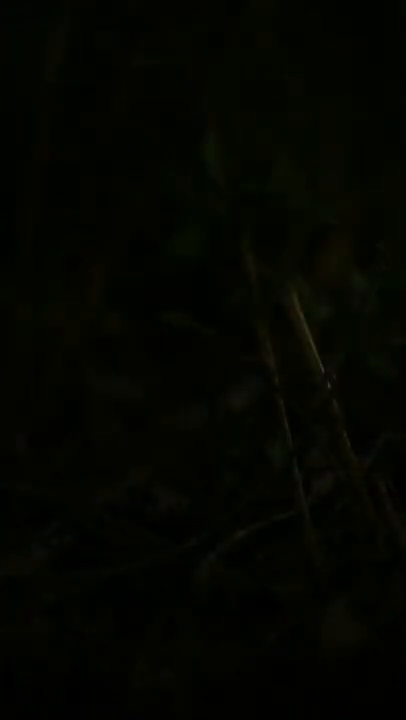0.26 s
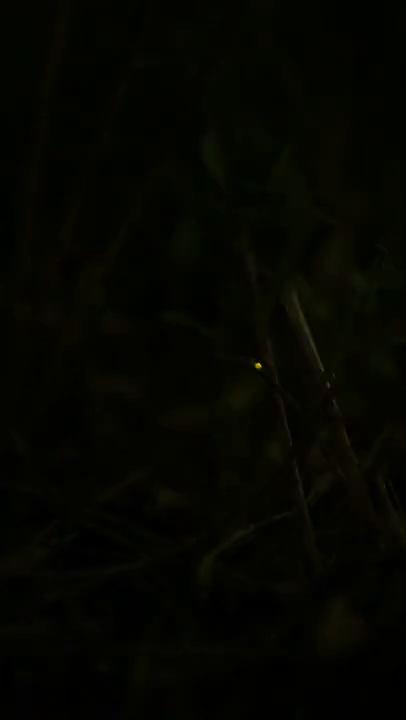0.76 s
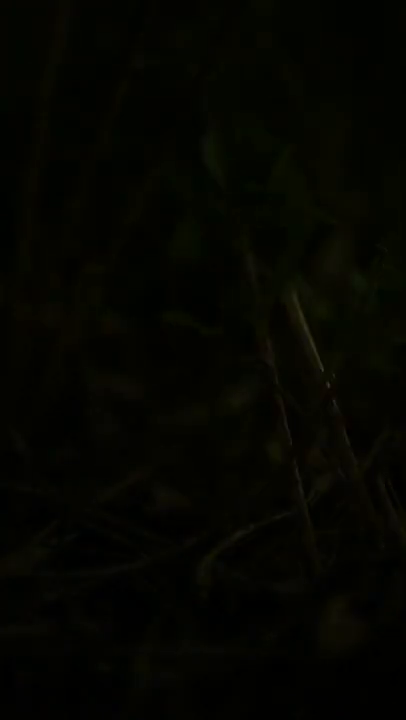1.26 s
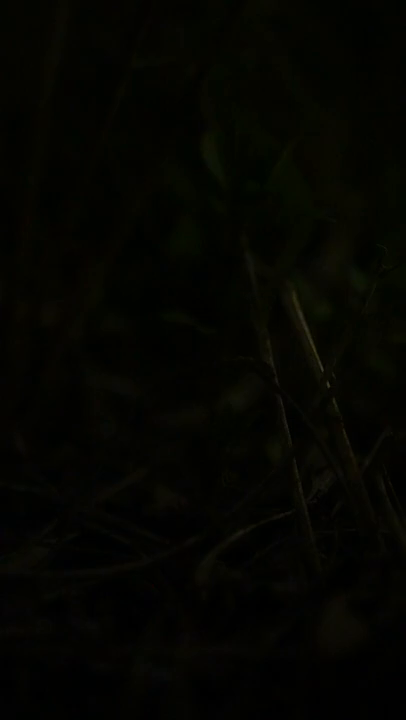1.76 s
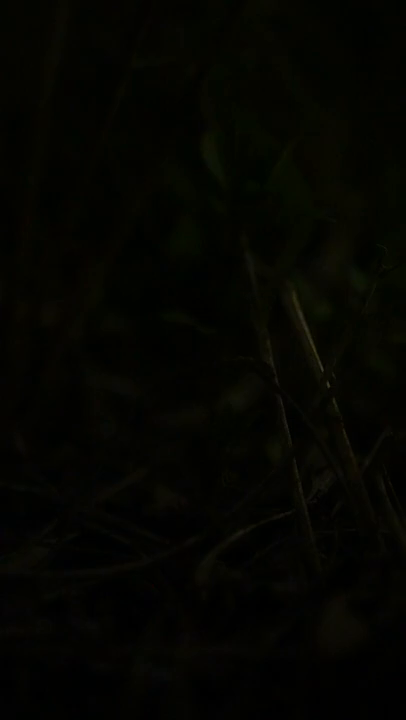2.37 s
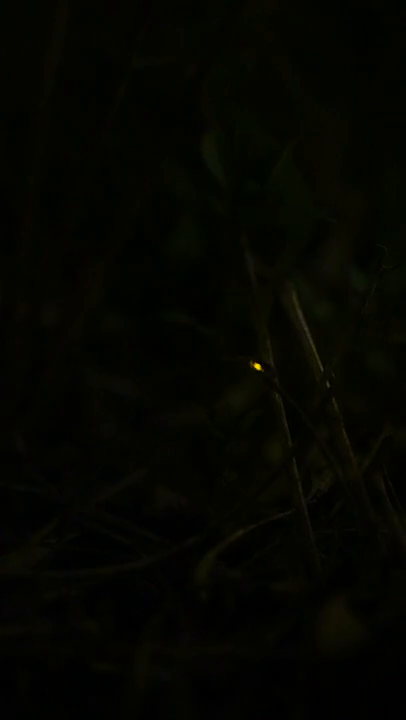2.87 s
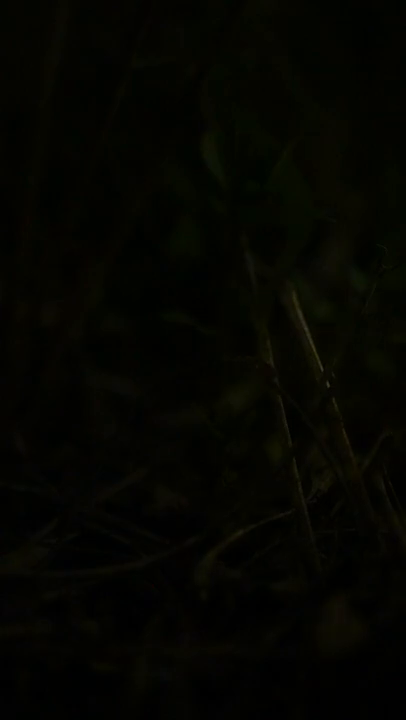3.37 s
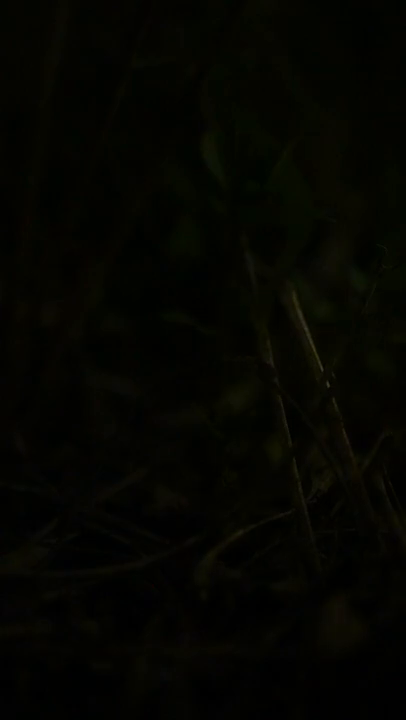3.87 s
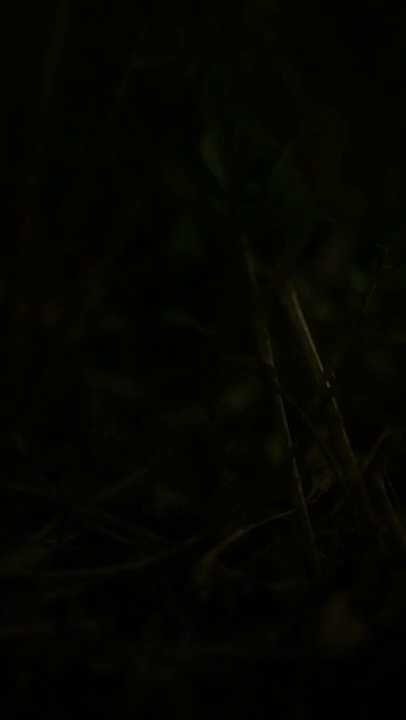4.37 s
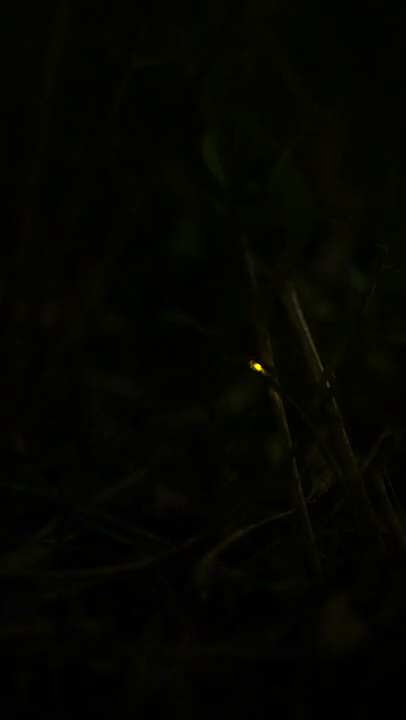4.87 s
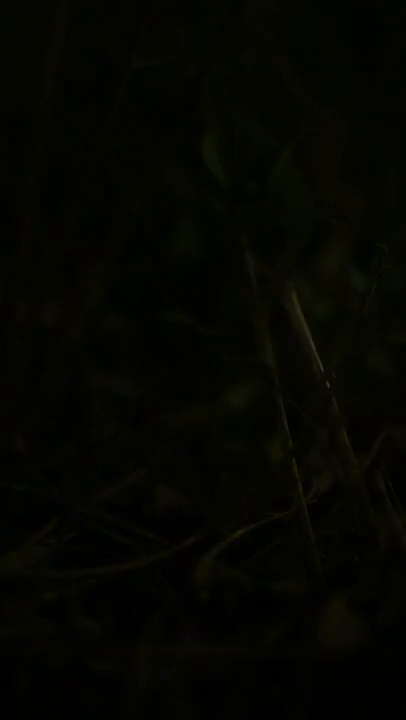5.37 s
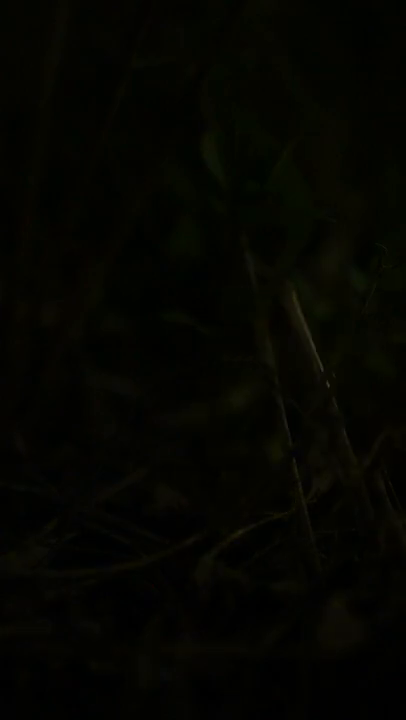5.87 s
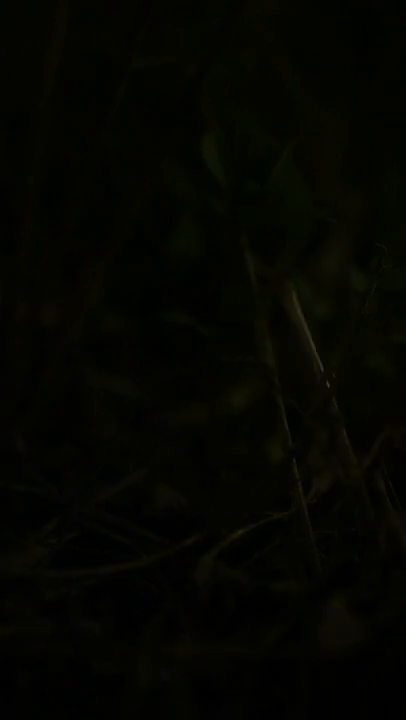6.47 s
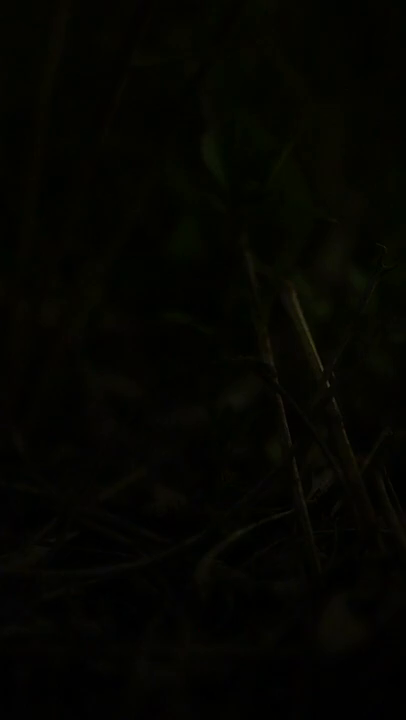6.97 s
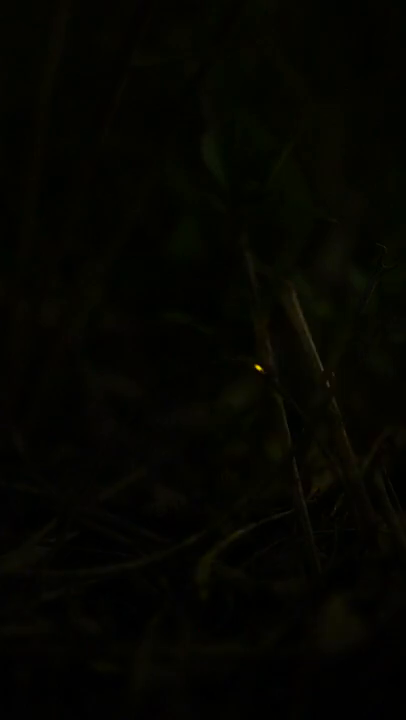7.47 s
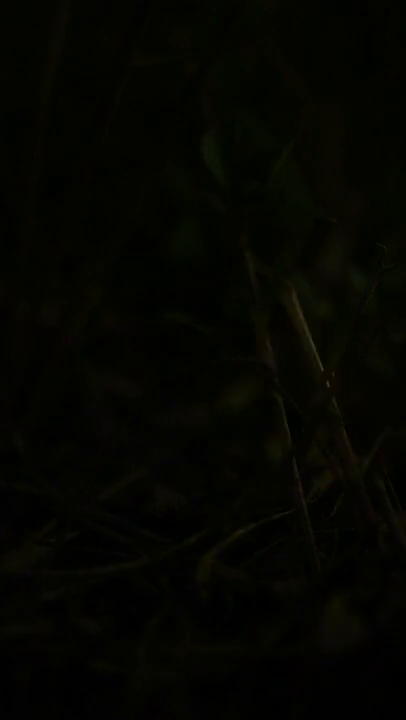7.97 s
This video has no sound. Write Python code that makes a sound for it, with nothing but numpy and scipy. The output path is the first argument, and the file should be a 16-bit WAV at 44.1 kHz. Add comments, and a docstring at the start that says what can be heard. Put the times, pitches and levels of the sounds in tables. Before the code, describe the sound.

Countless high, purring frog trills and short rising peeps overlap outdoors at night, over the steady soft rush of a small stream.

```python
"""Night beside a small stream, the microphone in the open: water rushes throughout as smooth, patchy noise.
From the start a far chorus of many random calls blurs into one band, and near frogs stand out before it
with rising trills of about forty pulses a second, soon joined by single rising whistles. Between about two
and five seconds come three steady bouts of whistles; later a few drops tick in the grass as short noise
bursts. Stones, reeds and banks add a short tail to every call."""
import sys
import numpy as np
from scipy import signal
from scipy.fft import rfft, irfft
from scipy.io import wavfile

SR = 44100
rng = np.random.default_rng(int(sys.argv[2]) if len(sys.argv) > 2 else 0)


def inscribe(sig):
    """Save sig as 16-bit PCM at rate SR to the path in sys.argv[1].

    A 1-D sig is mono; a 2-D sig holds one channel per row.
    Samples are clipped to [-1, 1] before scaling.
    """
    pcm = np.round(np.clip(np.atleast_2d(sig).T, -1, 1) * 32767)
    wavfile.write(sys.argv[1], SR, pcm.astype(np.int16))


N = 362061

# Rush of the stream. Each row: frequency in Hz, relative spectral level in dB.
STREAM_COLOUR = [(20, -15), (45, -10), (100, -8), (220, -3), (500, -1), (1250, 2), (1650, -1), (2700, -3),
                 (3400, -9.5), (4500, -17), (5500, -21.5), (7000, -28.5), (10000, -35), (13000, -38),
                 (16000, -44.5)]
# Swell of the far chorus. Each row: time in seconds, rms level in dB.
FAR_LEVELS = [(0.0, -33.5), (0.41, -33.5), (0.89, -35), (1.37, -32.5), (2.29, -35.5), (2.58, -34),
              (2.95, -36.5), (3.61, -37.5), (3.84, -38), (4.11, -36.5), (5.94, -36.5), (6.08, -34),
              (6.54, -37), (6.88, -34), (7.13, -34.5), (7.55, -33.5), (7.75, -37.5), (8.21, -32)]
# Near trills. Each row: start in seconds, length in seconds, start of the slow climb in Hz,
# pulse rate in Hz, level in dB before the call's own envelope and the wavering.
NEAR_TRILLS = [(0.006, 0.055, 2160, 43, -20.5), (0.102, 0.13, 1900, 36.7, -24.5),
               (0.277, 0.17, 2090, 41.5, -24), (0.28, 0.055, 2310, 42.6, -19.5),
               (0.376, 0.05, 2530, 37, -26), (0.425, 0.17, 1930, 41.2, -27.5),
               (0.574, 0.058, 1890, 37, -19), (0.603, 0.11, 2080, 40.5, -26),
               (0.783, 0.052, 2075, 36.2, -23.5), (0.881, 0.15, 2190, 41.3, -26),
               (0.95, 0.1, 1950, 41.2, -21), (1.114, 0.12, 2075, 46, -19), (1.25, 0.15, 1980, 43.9, -26),
               (1.328, 0.1, 1880, 43.4, -31), (1.437, 0.2, 2000, 38.7, -20.5),
               (1.508, 0.16, 1980, 45.7, -24), (1.745, 0.22, 1960, 45.6, -24),
               (1.793, 0.22, 1950, 37, -19.5), (1.968, 0.15, 2200, 45.1, -25),
               (2.175, 0.045, 1945, 39, -22), (2.251, 0.17, 2020, 41.3, -23),
               (2.593, 0.16, 1920, 45, -20.5), (2.649, 0.051, 1960, 45, -23),
               (2.69, 0.078, 2089, 40.7, -23), (2.824, 0.14, 2190, 36.4, -28),
               (2.886, 0.051, 2140, 44.5, -23), (2.977, 0.071, 2320, 44, -21.5),
               (3.7, 0.099, 2170, 44.6, -24), (4.108, 0.16, 2010, 41.6, -22),
               (4.238, 0.14, 1970, 36.4, -28), (4.575, 0.15, 2060, 43.2, -24.5),
               (4.754, 0.128, 2040, 39, -32), (4.815, 0.18, 2060, 41.2, -24), (4.882, 0.04, 2230, 40, -16),
               (4.941, 0.16, 2030, 41.1, -25), (5.121, 0.1, 1930, 39.2, -31), (5.198, 0.059, 2180, 43, -19),
               (5.408, 0.1, 2035, 45.3, -27.5), (5.504, 0.12, 2085, 40.5, -20),
               (5.633, 0.055, 2400, 42.5, -25.5), (5.679, 0.085, 2120, 40.8, -26),
               (5.812, 0.171, 1990, 42.1, -22), (5.843, 0.072, 2056, 37.3, -20.5),
               (5.914, 0.057, 2060, 41, -23), (6.188, 0.12, 1870, 44.5, -22),
               (6.678, 0.11, 1890, 44.5, -21), (6.693, 0.098, 2010, 45.1, -15),
               (6.711, 0.077, 2145, 36.2, -22.6), (6.793, 0.037, 2300, 45.3, -22),
               (6.972, 0.053, 2140, 37, -24), (7.068, 0.056, 1900, 43, -21), (7.254, 0.17, 1995, 45.2, -29),
               (7.455, 0.17, 2060, 38.9, -25.5), (7.464, 0.15, 2000, 36.5, -22.5),
               (7.695, 0.05, 2075, 45.6, -17), (7.832, 0.14, 2065, 45.1, -23),
               (7.893, 0.17, 2015, 38.9, -26), (8.126, 0.048, 1970, 41, -22)]
# Near single whistles. Each row: start in seconds, length in seconds, start pitch in Hz, rise in Hz
# (if it ran the full length), final flick in Hz, level in dB before envelope and wavering.
NEAR_WHISTLES = [(0.189, 0.1, 1960, 240, 200, -25.5), (0.577, 0.098, 1938, 113, 270, -27.5),
                 (0.667, 0.041, 2089, 68, 268, -26), (0.846, 0.033, 1966, 80, 0, -28),
                 (0.928, 0.115, 2320, 90, 90, -31), (1.015, 0.03, 1880, 120, 270, -36),
                 (1.118, 0.028, 1920, 90, 268, -25.5), (1.178, 0.12, 1766, 450, 2, -31.5),
                 (1.317, 0.029, 2153, 30, 2, -26), (1.517, 0.031, 2153, 36, 0, -27),
                 (1.576, 0.065, 1895, 68, 270, -27), (1.635, 0.034, 1930, 70, 0, -26.5),
                 (1.72, 0.045, 2010, 55, 270, -23), (2.064, 0.033, 2200, 120, 0, -26.5),
                 (2.159, 0.074, 2117, 185, 180, -28), (2.198, 0.023, 1962, 120, 0, -26),
                 (2.253, 0.056, 2046, 50, 270, -33), (2.358, 0.031, 2000, 115, 0, -25.5),
                 (2.472, 0.029, 2153, 20, 2, -23), (2.531, 0.14, 1787, 400, 0, -28),
                 (2.752, 0.039, 2290, 53, 0, -28), (3.129, 0.028, 2230, 60, 0, -27),
                 (3.234, 0.04, 2150, 100, -2, -30), (3.445, 0.035, 1970, 55, 0, -30),
                 (3.887, 0.03, 2120, 134, 0, -28.5), (4.46, 0.04, 2200, 130, 0, -28),
                 (5.295, 0.1, 2334, 81, 266, -29.5), (6.058, 0.094, 2003, 275, 2, -35.5),
                 (6.285, 0.072, 1960, 90, 272, -23), (6.334, 0.047, 2003, 200, 0, -28.5),
                 (6.82, 0.047, 2067, 50, 270, -31), (6.852, 0.11, 1930, 275, 0, -36),
                 (6.982, 0.083, 2085, 75, 2, -27.5), (7.808, 0.032, 2153, 110, 0, -27),
                 (7.922, 0.036, 2076, 65, 270, -27.5), (8.076, 0.11, 1873, 450, 0, -31),
                 (8.14, 0.063, 1981, 40, 0, -28.5)]
# Steady bouts of near whistles. Each row: first call in seconds, number of calls, first gap in seconds,
# last gap in seconds, call length in seconds, start pitch in Hz, rise in Hz, final flick in Hz,
# first and last level in dB, all as for single whistles; gaps run from start to start.
WHISTLE_BOUTS = [(1.713, 6, .1185, .1185, 0.063, 1880, 242, 1, -24, -22.5),
                 (2.296, 20, .1189, .13, .054, 2240, 130, 221, -27, -26),
                 (3.075, 7, .116, .116, 0.049, 2220, 120, 4, -30, -30.5)]
# Drops in the grass. Each row: start in seconds, level in dB of the noise burst before its band-pass.
DROPS = [(4.1854, -51), (5.6216, -51), (7.8356, -46), (7.9189, -51)]

STREAM_DB = -37  # rms
OCTAVE_DB = -33.5  # faint second harmonic of every voice
TRILL_CLIMB_HZ_PER_S = 1600  # near trills
SQUEEZE_S, SQUEEZE_EDGE_S = 0.011, 0.002  # last squeeze of a whistle: its length and how fast it sets in
FAR_VOICE_HZ, FAR_SPREAD_HZ, FAR_RISE_HZ = 1945, 100, 260.15
FAR_SPREAD_DB = 2.0  # loudness spread from call to call
BANK_T60_S, BANK_DB = 0.15, -20  # decay by 60 dB, and level of the tail against the calls
TIRING_POWER = 6  # high, so the gaps of a bout change only near its end
CUTOFF_HZ = 15710


def from_db(db):
    """Decibels to gain."""
    return 10 ** (np.asarray(db) / 20)


def rms_one(x):
    """Scale to rms 1."""
    return x / np.sqrt(np.mean(x ** 2) + 1e-20)


def drift(rate_hz):
    """Slow chance: noise at every 40th sample through a double one-pole low-pass, spread about 1."""
    pole = np.exp(-80 * np.pi * rate_hz / SR)
    noise = rng.standard_normal(N // 40 + 2002)
    slow = signal.lfilter([1], [1, -2 * pole, pole * pole], noise)[2000:]  # drop the filter's run-in
    return np.interp(np.arange(N) / 40, np.arange(len(slow)), rms_one(slow))


def add(track, start_s, sound):
    """Mix a sound in at its start time, cut at both ends of the track."""
    at = round(start_s * SR)
    first, last = max(at, 0), min(at + len(sound), N)
    if last > first:
        track[first:last] += sound[first - at:last - at]


def stream(patchy_db):
    """Countless far bubbles merge into smooth noise; each octave swells a little on its own."""
    hz = np.maximum(np.arange(N // 2 + 1) * SR / N, 1)
    table_hz, table_db = np.transpose(STREAM_COLOUR)
    level_db = np.interp(np.log(hz), np.log(table_hz), table_db)
    colour = rfft(rng.standard_normal(N)) * from_db(level_db)
    octave = np.clip(np.log2(hz / 30), 0, 9)
    out = 0
    for k in range(10):
        share = np.clip(1 - np.abs(octave - k), 0, 1)  # overlapping triangles
        swell = from_db(patchy_db * (drift(4) + drift(25)))
        out = out + irfft(colour * share, N) * swell
    return from_db(STREAM_DB) * rms_one(out)


def sine(hz, turn):
    """A near-pure tone that follows a pitch track, starting at a given fraction of a turn."""
    phase = 2 * np.pi * (np.cumsum(hz) / SR + turn)
    return np.sin(phase) + from_db(OCTAVE_DB) * np.sin(2 * phase)


def trill(length, start_hz, end_hz, pulse_hz, turn):
    """The glottis opens pulse by pulse; each pulse chirps upward on top of the slow climb."""
    t = np.arange(int(length * SR)) / SR
    cycle = t * pulse_hz % 1
    climb_hz = start_hz + (end_hz - start_hz) * t / length
    chirp_hz = 350 * (cycle - 0.3)
    opening = np.sin(np.pi * np.clip(cycle / 0.64, 0, 1))  # shut for the rest of each cycle
    swell = 0.23 + 0.46 * t / length
    fade = np.minimum(1, (length - t) / 0.003)
    return swell * opening * fade * sine(climb_hz + chirp_hz, turn)


def whistle(length, start_hz, end_hz, flick_hz, turn):
    """One breath through the vocal sac: pitch and level climb; a last squeeze may flick both upward."""
    t = np.arange(int(length * SR)) / SR
    squeeze = 1 / (1 + np.exp((length - SQUEEZE_S - t) / SQUEEZE_EDGE_S))
    climb = np.minimum(t, length - SQUEEZE_S) / length  # halts at the squeeze
    hz = start_hz + (end_hz - start_hz) * climb + flick_hz * squeeze
    effort = t / length
    if flick_hz > 50:  # only a clear flick shapes the level too
        effort = (squeeze + effort) / 2
    edges = np.minimum(1, t / 0.016) * np.minimum(1, (length - t) / 0.0034)
    return (0.4 + 0.6 * effort) * edges * sine(hz, turn)


def far_frogs(count=800):
    """Many far calls at random moments, each with its own voice; one in five whistles, the rest trill."""
    out = np.zeros(N)
    draws = np.c_[rng.random((count, 4)), rng.standard_normal((count, 2))]
    for when, kind, turn, span, voice, loud in draws:
        start_s = when * (N / SR + 0.2) - 0.2  # some calls are already under way at the start
        hz = FAR_VOICE_HZ + FAR_SPREAD_HZ * np.clip(voice, -1.6, 1.6)
        if kind < 1 / 5:
            call = 0.66 * whistle(0.0393 + 0.0424 * span, hz, hz + 0.613 * FAR_RISE_HZ, 0, turn)
        else:
            call = trill(0.08 + 0.12 * span, hz, hz + FAR_RISE_HZ, 37 + 9 * turn, turn)
        add(out, start_s, from_db(FAR_SPREAD_DB * loud) * call)
    times_s, levels_db = np.transpose(FAR_LEVELS)
    return from_db(np.interp(np.arange(N) / SR, times_s, levels_db)) * rms_one(out)


def banks(calls):
    """Stones, reeds and the banks scatter the calls into a short dying tail."""
    t = np.arange(SR // 2) / SR
    decay = from_db(-60 * t / BANK_T60_S) * np.minimum(1, t / 0.0034)
    tail = rng.standard_normal(len(t)) * decay
    return signal.fftconvolve(calls, tail / np.sqrt(np.sum(tail ** 2)))[:N]


def near_frogs():
    """The callers that stand out one by one; moving air makes them waver and roughens them."""
    out = np.zeros(N)
    turns = rng.random(len(NEAR_TRILLS))
    for (s, length, hz, pulse_hz, level_db), turn in zip(NEAR_TRILLS, turns):
        end_hz = hz + TRILL_CLIMB_HZ_PER_S * length
        add(out, s, from_db(level_db) * trill(length, hz, end_hz, pulse_hz, turn))
    whistles = bouts() + list(NEAR_WHISTLES)
    turns = rng.random(len(whistles))
    for (s, length, hz, rise_hz, flick_hz, level_db), turn in zip(whistles, turns):
        add(out, s, from_db(level_db) * whistle(length, hz, hz + rise_hz, flick_hz, turn))
    return out * from_db(0.62 * drift(30) + 1.36 * drift(160))


def bouts():
    """Spell each bout out as whistles at a steady pace; where its last gap is longer, the frog tires."""
    rows = []
    for first_s, calls, gap_s, last_gap_s, *shape, first_db, last_db in WHISTLE_BOUTS:
        tiring = np.linspace(0, 1, round(calls) - 1) ** TIRING_POWER
        gaps = gap_s + (last_gap_s - gap_s) * tiring
        starts = first_s + np.r_[0, np.cumsum(gaps)]
        levels_db = np.linspace(first_db, last_db, len(starts))
        rows += [(s, *shape, db) for s, db in zip(starts, levels_db)]
    return rows


def drops():
    """Tiny bright ticks of water on leaves: band-passed noise that dies within milliseconds."""
    out, t = np.zeros(N), np.arange(SR // 100) / SR
    for s, level_db in DROPS:
        add(out, s, from_db(level_db) * rng.standard_normal(len(t)) * np.exp(-t / 0.0013))
    bright = signal.butter(2, [6000, 12000], "band", fs=SR, output="sos")
    return signal.sosfilt(bright, out)


def scene():
    """Water, far and near frogs with their scattered tail, and drops, on one channel."""
    water = stream(patchy_db=0.47)
    frogs = far_frogs() + near_frogs()
    tail = from_db(BANK_DB) * banks(frogs)
    return (water + frogs + tail + drops())[None]


def record(dry):
    """A steep low-pass cuts the top."""
    return signal.sosfilt(signal.ellip(12, 0.3, 60, CUTOFF_HZ, fs=SR, output="sos"), dry)


dry = scene()
out = record(dry)
inscribe(out)
```